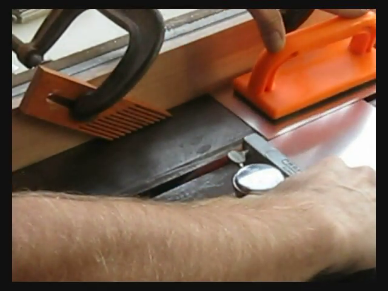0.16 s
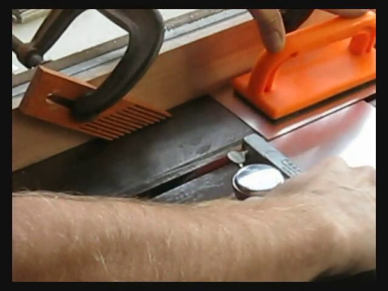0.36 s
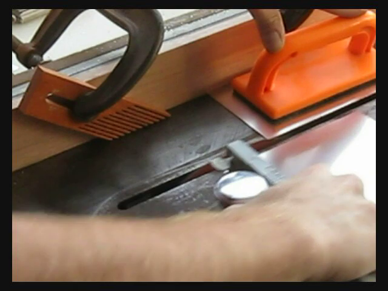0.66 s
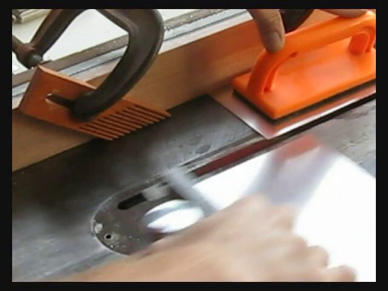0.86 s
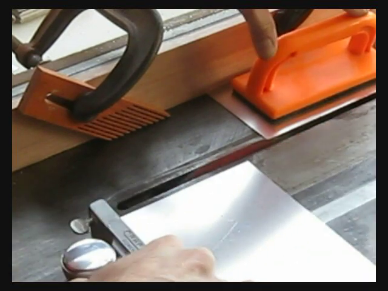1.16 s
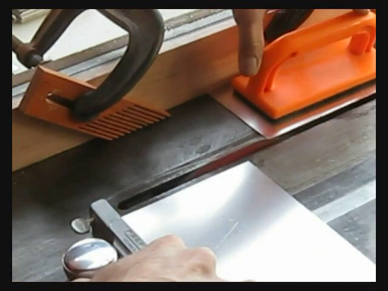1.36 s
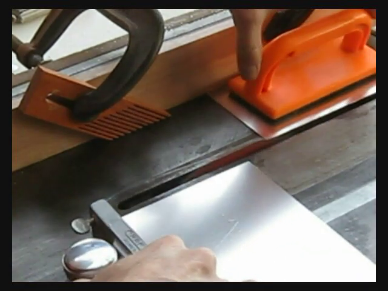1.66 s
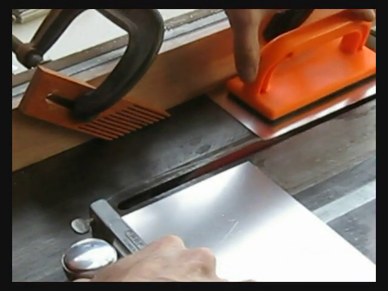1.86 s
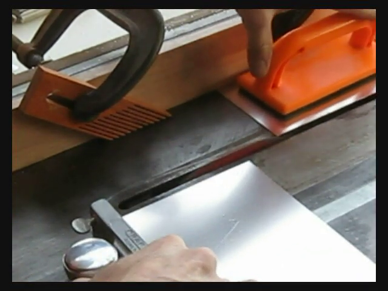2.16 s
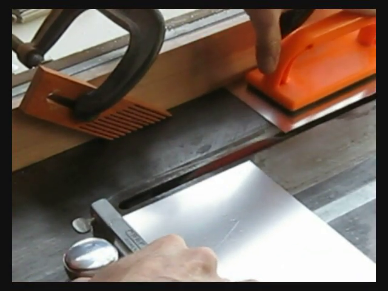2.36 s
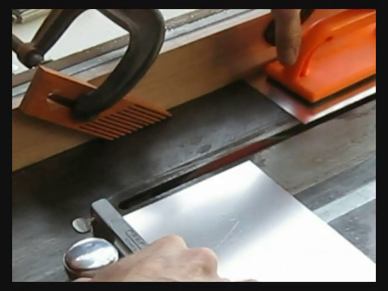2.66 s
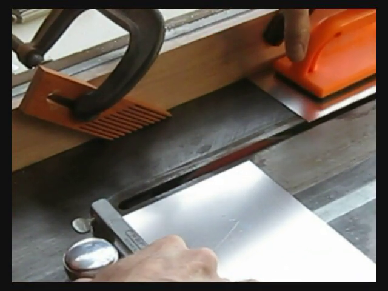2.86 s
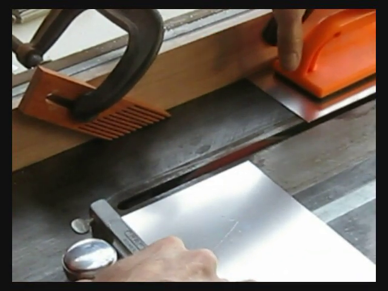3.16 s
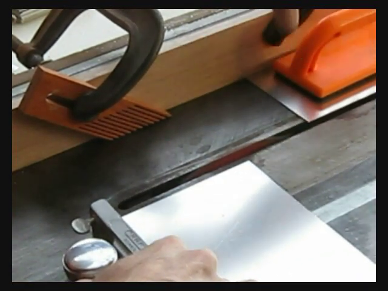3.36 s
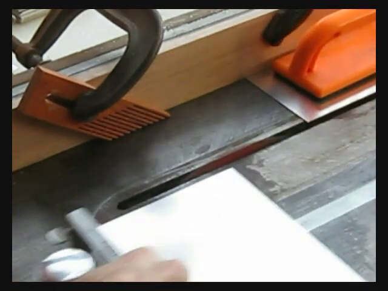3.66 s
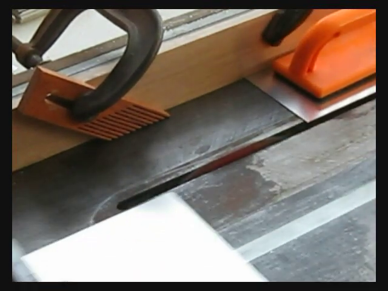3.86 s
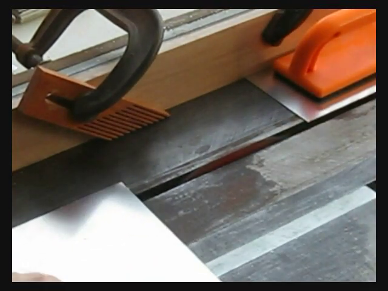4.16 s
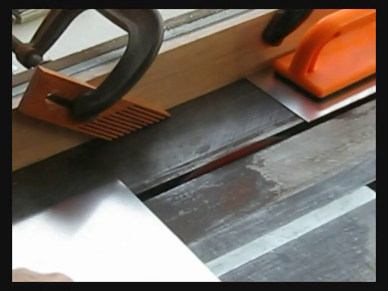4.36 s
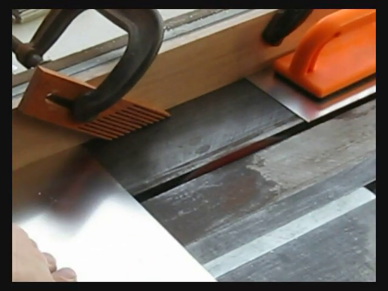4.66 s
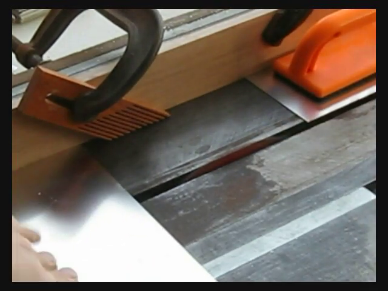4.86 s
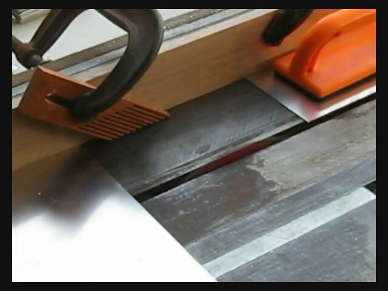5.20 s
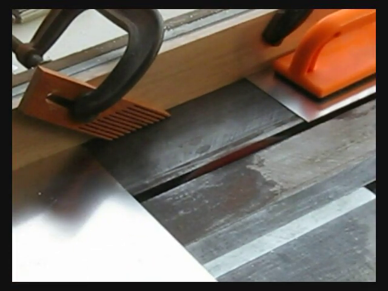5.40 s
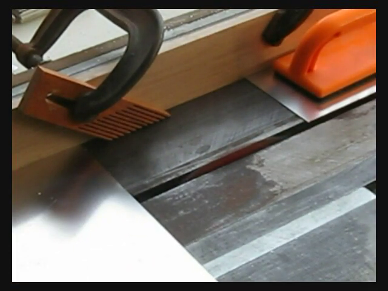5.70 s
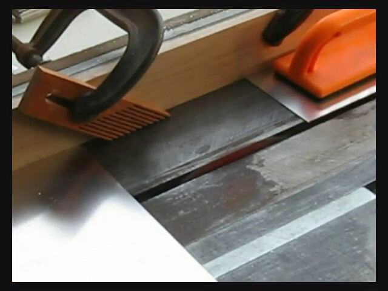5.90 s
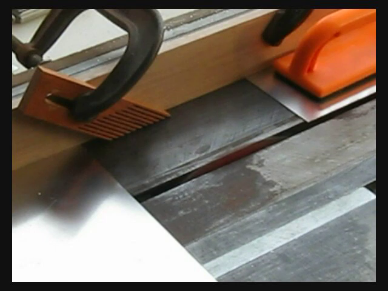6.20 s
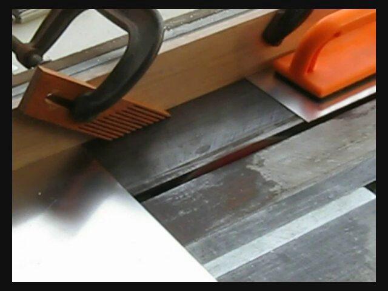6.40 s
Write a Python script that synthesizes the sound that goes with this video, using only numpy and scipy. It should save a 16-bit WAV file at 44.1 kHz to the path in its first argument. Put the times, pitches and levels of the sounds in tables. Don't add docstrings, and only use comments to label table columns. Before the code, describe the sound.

A table saw runs without cutting throughout, close to a cheap camera microphone in a workshop: rough airy tooth whir, faint ringing, cabinet rumble and low electric hum. A thin metal sheet sizzles lightly near one second and more strongly around two, with a short buzz, while the overall level ducks. It recovers, then a sharp knock near 4.6 seconds makes the level drop again.

```python
import sys
import numpy as np
from scipy import signal
from scipy.fft import rfft, irfft, next_fast_len
from scipy.io import wavfile
from scipy.ndimage import uniform_filter1d

SR = 44100
rng = np.random.default_rng(int(sys.argv[2]) if len(sys.argv) > 2 else 0)


def store_wav(level_fs):
    pcm = np.round(np.clip(np.atleast_2d(level_fs), -1, 1) * 32767)
    wavfile.write(sys.argv[1], SR, pcm.T.astype(np.int16))


def volts_from_db(level):
    exponent = np.asarray(level, float) / 20
    return 10 ** exponent


N = 288395

# [t/s, peak level/dB, push direction]
KNOCKS = [
    (4.6135, -18, 1),
    (4.6202, -8.5, -1),
]


def level(x, db):
    return x * volts_from_db(db) / np.sqrt(np.mean(x ** 2))


def curve(rows):
    t_s, *columns = np.transpose(rows)
    return [np.interp(np.arange(N) / SR, t_s, column) for column in columns]


def walk(rate_hz):
    hold = int(SR / rate_hz)
    steps = np.repeat(rng.standard_normal(N // hold + 1), hold)
    slewed = uniform_filter1d(uniform_filter1d(steps, hold), hold)
    return 1.3 * slewed[:N]


def colour(x, points):
    size = next_fast_len(N)
    hz, db = np.transpose(points)
    bins_hz = np.arange(size // 2 + 1) * SR / size
    gain = volts_from_db(np.interp(np.log(bins_hz + 1), np.log(hz), db))
    return irfft(rfft(x, size) * gain, size)[:N]


def ring(x, hz, width_hz):
    pole = np.exp((2j * np.pi * hz - np.pi * width_hz) / SR)
    return signal.lfilter([1], [1, -pole], x).imag


def rattle(grain_db, rate_hz):
    return rng.standard_normal(N) * volts_from_db(grain_db * walk(rate_hz))


def blade(shake):
    # [f/Hz, level/dB per Hz]
    whir_colour = [(700, -39), (1100, -18.5), (1500, -6), (1900, -3.5), (2050, -0.5), (2500, 0.5),
                   (3300, 0), (4200, -1.5), (5000, -3), (6000, -13.5)]
    modes_hz = [2060, 2225, 2340, 2510, 2668, 2858, 3111, 3993, 4771]
    # [width/Hz, level/dB against whir]
    mode_rows = [(9, -16.5), (18, -17.5), (50, -19), (18, -16.5), (32, -17), (25, -22), (10, -20),
                 (12, -25), (9, -24)]
    swell = volts_from_db(0.52 * shake + 0.24 * walk(9))
    whir = level(colour(rattle(0.32, 400), whir_colour), -0.36)
    modes = np.zeros(N)
    for hz, (width_hz, db) in zip(modes_hz, mode_rows):
        modes += level(ring(rng.standard_normal(N), hz, width_hz) * volts_from_db(2.4 * walk(5)), db)
    return swell * (whir + modes)


def cabinet(shake):
    # [f/Hz, level/dB per Hz]
    rumble_colour = [(70, -46), (130, -17), (160, -15), (210, -26.5), (240, -3), (300, -2.5), (450, -1),
                     (560, -4), (700, -7), (940, -7), (1000, -13.5), (1150, -15.5), (1400, -19.5),
                     (2000, -44)]
    panels_hz = [238, 316, 457, 661, 725, 782, 842, 952, 1035, 1253]
    # [width/Hz, level/dB against rumble]
    panel_rows = [(18, -15), (24, -12), (22, -11.5), (14, -17), (11, -16.5), (18, -17), (11, -17.5),
                  (14, -17), (14, -21), (8, -28)]
    # [f/Hz, level/dB]
    panel_cut = [(30, -6), (60, -3), (100, 0)]
    # [f/Hz, level/dB per Hz]
    tremor_colour = [(15, -37), (30, -36), (45, -24), (65, -10), (90, -2), (105, 0), (140, 0), (200, -30)]
    swell = volts_from_db(0.22 * shake + 0.52 * walk(11))
    rumble = level(colour(rattle(0.54, 300), rumble_colour), -1.7)
    panels = np.zeros(N)
    for hz, (width_hz, db) in zip(panels_hz, panel_rows):
        panels += level(ring(rng.standard_normal(N), hz, width_hz), db)
    tremor = level(colour(rng.standard_normal(N), tremor_colour), -25.5)
    return swell * (rumble + colour(panels, panel_cut)) + tremor


def drumming_db():
    # [t/s, rumble level/dB against whir]
    cover = [(0, 1.5), (1.6, 1.5), (1.83, -2), (2.07, -1), (2.25, 1), (2.5, -0.35), (4.6, 0.05), (4.7, 1),
             (5.3, -0.1), (6.54, 0.05)]
    shudder_db, fade_s = 11.5, 0.022
    after_s = np.arange(N) / SR - KNOCKS[-1][0]
    return curve(cover)[0] + shudder_db * np.exp(-np.abs(after_s) / fade_s) * (after_s > 0)


def motor(gain_db):
    # [t/s, depth/dB, width/s]
    damped = [
        (1.9, 12, 0.096),
        (1.7, 4, .04),
        (4.53, 5.5, 0.07),
    ]
    hum_hz, shaft_hz = 119.94, 59.7
    hum_level_db, flicker_db, shaft_level_db = -11, 1.6, -27
    t = np.arange(N) / SR
    damped_db = sum(db * np.exp(-((t - s) / width_s) ** 2) for s, db, width_s in damped)
    hum_db = gain_db + hum_level_db + flicker_db * walk(11) - damped_db
    hum = np.sqrt(2) * np.sin(2 * np.pi * hum_hz * t + 0.14 * walk(6)) * volts_from_db(hum_db)
    shaft_db = gain_db + shaft_level_db + 1.5 * walk(3)
    return hum + np.sin(2 * np.pi * shaft_hz * t + 0.3 * walk(4)) * volts_from_db(shaft_db)


def sizzle():
    # [t/s, level/dB against whir]
    strength = [(0, -24), (.9, -8), (1.2, -24.5), (1.55, -13.5), (1.8, -4.5), (2.05, -6.5), (2.3, -15),
                (2.6, -27), (6.54, -33)]
    # [f/Hz, level/dB per Hz]
    contact_colour = [(2500, -31), (4000, -9), (5000, 3), (7000, 0.5)]
    return level(colour(rattle(2.1, 600), contact_colour), 11) * volts_from_db(curve(strength)[0])


def gain_control():
    # [t/s, depth/dB, hold/s]
    ducks = [(-.05, 3, 0.22), (0.285, 1, 0.35), (.83, 2, 0.092), (0.975, 2, .12), (1.25, 0.5, 0.32),
             (1.53, 2.5, 0.074), (1.666, 3.5, 0.13), (1.77, 6, .03), (1.807, 7.5, .06), (1.933, 9, 0.092),
             (2.088, 11, 0.17), (3.147, 0.5, .05), (4.102, 0, 0.17), (4.621, 12.5, .01),
             (4.64, 13.5, 0.033)]
    full_gain_db, fall_s, recover_db_per_s, settle_s = -24.5, 0.0035, 27.5, 0.046
    knee_db = recover_db_per_s * settle_s
    t = np.arange(N) / SR
    cut_db = np.zeros(N)
    for s, depth_db, hold_s in ducks:
        left_db = depth_db - recover_db_per_s * np.maximum(t - s - hold_s, 0)
        eased_db = knee_db * np.logaddexp(0, left_db / knee_db)
        cut_db = np.maximum(cut_db, eased_db * np.clip((t - s) / fall_s, 0, 1))
    return full_gain_db - cut_db


def buzz():
    # [t/s, level/dB]
    touch = [(1.8, -52), (1.83, -42), (1.88, -38), (1.92, -33.5), (2.065, -33.5), (2.1, -46), (2.15, -48),
             (2.21, -42), (2.26, -52)]
    # [multiple of the table's shake, level/dB]
    orders = [(6, -11), (7, 0), (16, -14), (37, -14), (39.5, -15), (41, -16), (42.4, -14), (44, -8)]
    shake_hz, edge_s = 119.2, 0.014
    t = np.arange(N) / SR
    phase = 2 * np.pi * shake_hz * t + 0.03 * walk(15)
    tones = sum(volts_from_db(db + 0.3 * walk(14)) * np.sin(k * phase) for k, db in orders)
    touching = np.clip(np.minimum(t - touch[0][0], touch[-1][0] - t) / edge_s, 0, 1)
    return np.sqrt(2) * tones * volts_from_db(curve(touch)[0]) * touching


def knocks():
    # [f/Hz, level/dB, t60/s]
    modes = [(403, -11, 0.1), (710, -6, 0.038), (1110, 5, 0.021), (1570, -10, .012), (2670, -19, .008)]
    blows = np.zeros(N)
    for s, db, way in KNOCKS:
        blows[int(s * SR)] = volts_from_db(db) * np.sign(way)
    blows = np.convolve(blows, signal.windows.hann(9) / 4)[:N]
    return 0.46 * sum(volts_from_db(db) * ring(blows, hz, np.log(1000) / np.pi / t60_s) for hz, db, t60_s in modes)


def scene():
    gain_db = gain_control()
    shake = walk(40)
    saw = blade(shake) + volts_from_db(drumming_db()) * cabinet(shake) + sizzle()
    ducked = (saw + knocks() * volts_from_db(20.5)) * volts_from_db(gain_db)
    return (ducked + motor(gain_db) + buzz())[None]


def band_limit(x):
    return signal.sosfilt(signal.butter(12, 15720, fs=SR, output="sos"), x)


def record(dry):
    top_hz, offset, mu, steps_per_side = 5190, 0.0092, 255, 127
    taps = signal.firwin(241, top_hz, window=("kaiser", 6), fs=SR)
    x = signal.fftconvolve(dry, taps[None], "same") + offset
    squeezed = np.sign(x) * np.log1p(mu * np.abs(x)) / np.log1p(mu)
    stepped = np.round(squeezed * steps_per_side) / steps_per_side
    expanded = np.sign(stepped) * np.expm1(np.abs(stepped) * np.log1p(mu)) / mu
    return band_limit(expanded)


dry = scene()
out = record(dry)
store_wav(out)
```